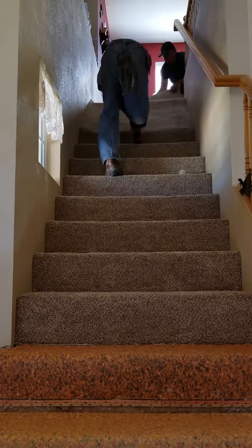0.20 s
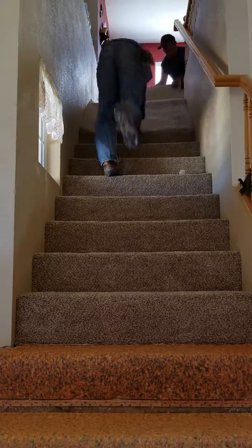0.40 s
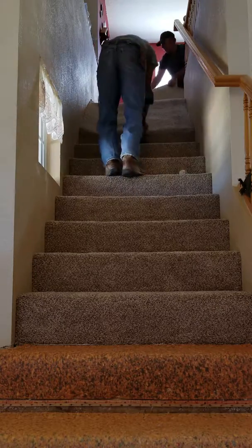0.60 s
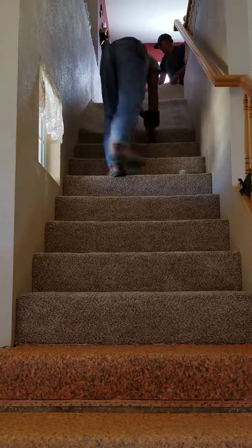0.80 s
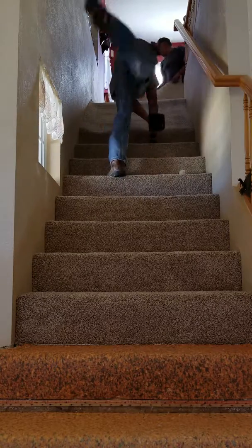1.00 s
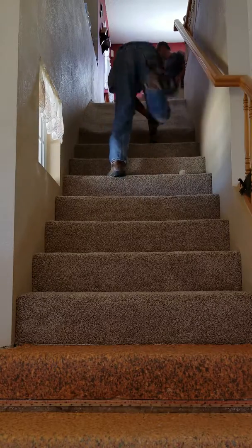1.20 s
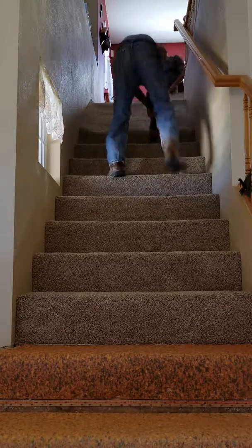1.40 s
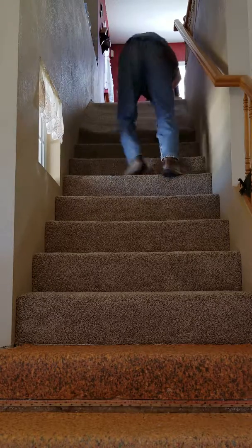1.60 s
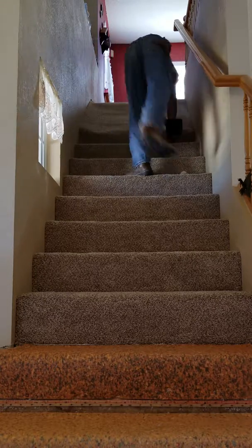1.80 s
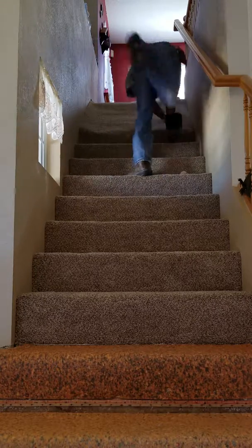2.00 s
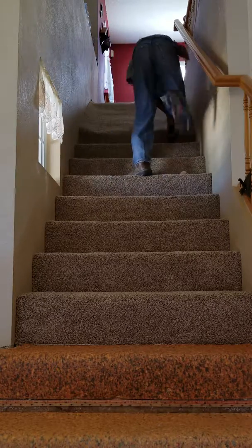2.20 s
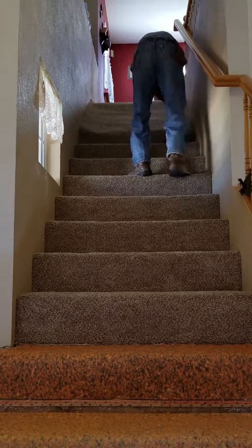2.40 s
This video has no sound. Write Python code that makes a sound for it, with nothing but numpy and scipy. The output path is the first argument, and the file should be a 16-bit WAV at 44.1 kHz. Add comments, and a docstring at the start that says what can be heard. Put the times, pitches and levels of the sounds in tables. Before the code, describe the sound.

Three weighty boot steps land on carpeted stairs in a narrow stairwell, with light brushing between

```python
"""Boots on carpeted stairs

Heavy work boots climb carpeted wooden stairs in a narrow stairwell. Soles slap as fading crackle; landing
weight pushes on ringing stair modes, flexing treads and rumbling timber noise. Resonant knocks fall between.
Boots and trousers brush the carpet as dense grains. Small sharp ticks are laces and grit between steps,
and the bright edge of sole slaps.
A faint metallic ring and quiet noise lie behind; decaying stereo noise gives the stairwell its echoes."""
import sys
import numpy as np
from scipy import signal
from scipy.fft import rfft, irfft
from scipy.io import wavfile

SR = 44100
rng = np.random.default_rng(int(sys.argv[2]) if len(sys.argv) > 2 else 0)


def materialize(psi):
    """Save the field psi as 16-bit PCM at rate SR to the path in sys.argv[1].

    A 1-D psi becomes a single channel; in a 2-D psi each row is a channel.
    """
    bounded = np.clip(np.atleast_2d(psi).T, -1, 1)
    quanta = np.round(bounded * 32767).astype(np.int16)
    wavfile.write(sys.argv[1], SR, quanta)


N = 105840
T = np.arange(N) / SR
SIZE = 2 ** 17  # transform length, samples
HZ = np.maximum(np.arange(SIZE // 2 + 1) * SR / SIZE, 1)

# soles meeting the tread: start_s, level_db, fade_s, treble_db
SOLE_SLAPS = [(0.2027, -16, 0.0019, 0.5), (0.2069, -11.5, 0.0052, -1.5), (1.1512, -20, 0.0012, -9),
              (1.1571, -11.5, 0.0049, 0.5), (2.073, -26.5, 0.0023, 7), (2.078, -19, 0.0053, -8.5),
              (2.085, -26.5, 0.0027, -24)]
# weight landing on a tread: start_s, push_db, contact_s, tread_pitch_hz, tread_ring_db,
# timber_rumble_db, rumble_rise_s, rumble_upper_db
WEIGHT_THUDS = [(0.209, -10.5, 0.0062, 113.4, -4.5, -11.5, 0.0068, 0.5),
                (.25, -14.5, 0.0083, 145, -11, -21, 0.0065, 7),
                (0.544, -26, 0.0093, 115, -28.5, -44, .005, -8),
                (0.767, -19.5, 0.026, 230.4, -39, -48, 0.011, -6.5),
                (0.828, -33, 0.021, 229.3, -51, -60, 0.015, 0),
                (1.162, -11, 0.0095, 338.4, -18, -14.5, 0.013, 9.5),
                (1.177, -11.5, 0.031, 124.2, -10, -49, 0.0033, 7),
                (1.423, -40, 0.011, 288, -42, -30, 0.058, 3.5),
                (1.466, -24, 0.0067, 72.7, -12.5, -33.5, 0.029, -17),
                (1.686, -21.5, .025, 63.8, -35, -67, 0.0084, -2),
                (2.082, -16, 0.0082, 174, -16.5, -19, 0.016, 2.5),
                (2.1, -18, 0.013, 123.4, -22.5, -26, 0.0055, -2),
                (2.299, -38, 0.024, 238, -27, -37, 0.013, -2),
                (2.352, -32.5, 0.0084, 86, -29.5, -39, 0.0061, -2)]
# ringing modes of the staircase: pitch_hz, level_db, t60_s
STAIR_MODES = [(34, -13, 0.15), (47.2, 1.5, 0.34), (63.25, 4, .42), (81, -1, 0.21), (104, -11, 0.12),
               (132.4, 7, 0.18), (147, -14, 0.16), (214, -16, .12), (238, 0, 0.44), (324.6, -1.5, 0.19),
               (484, -5, .22), (550, -22, .22), (710, -27, .22)]
# spectrum of the timber rumble: frequency_hz, density_db
TIMBER_COLOUR = [(25, -19.5), (50, 0.5), (90, 5), (155, 4), (240, 1.5), (330, -4), (460, -11.5), (700, -27),
                 (1200, -30.5), (3000, -57)]
# hollow knocks: start_s, level_db, fade_s, upper_resonances_db
HOLLOW_KNOCKS = [(1.763, -38.5, 0.011, 10), (1.791, -43, 0.01, 13), (2.033, -28.5, 0.028, -3.5),
                 (2.297, -28, 0.022, 0.5), (2.323, -23.5, 0.018, -3.5)]
# resonances of the knocked body: pitch_hz, width_hz, level_db
KNOCK_BODY = [(162, 49, -6), (237, 17.7, 6), (304, 42.4, 1.5), (458, 87, -4.5), (544.6, 42, -3),
              (814, 123, -18), (1430, 280, -25.5)]
# boots and cloth brushing the carpet: start_s, level_db, rise_s, hold_s, fade_s, treble_db
CARPET_SCUFFS = [(0.021, -64, 0.0052, 0.068, 0.021, 9), (0.119, -50, 0.0064, 0.097, 0.027, 5.5),
                 (.29, -49.5, 0.037, 0.18, 0.051, 11.5), (0.534, -47.5, 0.009, 0.039, 0.016, -20),
                 (0.64, -53.5, 0.014, 0.077, .025, 20), (0.752, -39, .01, 0.03, 0.02, 15.5),
                 (0.808, -44.5, 0.026, 0.035, 0.02, 3), (0.928, -41.5, 0.015, 0.019, 0.016, 9.5),
                 (1.016, -47.5, 0.0051, 0.014, 0.032, -17), (1.381, -59, .01, 0.16, 0.082, 9),
                 (1.693, -41, 0.0023, 0.0083, 0.049, 9.5), (1.797, -47.5, 0.0072, 0.085, 0.086, 0),
                 (1.968, -50.5, 0.012, 0.073, 0.02, 2), (2.122, -56.5, 0.013, 0.018, 0.036, 18.5),
                 (2.266, -61, 0.0099, 0.12, 0.058, 9.5)]
# small sharp ticks, laces and grit between steps and the bright edge of sole slaps:
# start_s, bright_tip_db, lower_snap_db, snap_pitch_hz
SMALL_TICKS = [(.136, -29.5, -29.5, 3700), (0.145, -63, -29, 4700), (0.2086, -12.5, -9, 2200),
               (.3953, -34, -50, 4500), (0.42, -46, -27, 4500), (0.4292, -28.5, -26.5, 4700),
               (0.4784, -22.5, -19.5, 6060), (.548, -19.5, -25, 4700), (0.5752, -21, -32, 4960),
               (.58, -33, -27.5, 4300), (0.7302, -39, -25.5, 3240), (.762, -18.5, -29, 3630),
               (.768, -27, -16.5, 3080), (.8205, -30, -32, 3500), (0.8414, -28, -24, 4230),
               (.8683, -26, -35, 3500), (0.9472, -25, -12.5, 3120), (.953, -26, -41, 4500),
               (1.0195, -15, -19.5, 2100), (1.158, -14, -21, 3640), (1.401, -49, -38, 3350),
               (1.6992, -27.5, -20.5, 1960), (1.8174, -14.5, -23, 4040), (1.8208, -14, -17, 1900),
               (1.8735, -22, -43, 2400), (1.8925, -20, -18, 2160), (1.9208, -31, -21.5, 3050),
               (1.9358, -23, -24, 2360), (1.982, -30, -18, 4150), (2.042, -43, -21.5, 3570),
               (2.0787, -15, -20, 4220)]
# spectra of slaps, scuffs, tick tips, tick snaps and the background: frequency_hz, density_db
SLAP_COLOUR = [(60, -8.5), (300, 3), (600, 5.5), (900, -3), (2000, 1), (3000, -2.5), (4000, 0),
               (5600, -5.5), (7800, -16), (10500, -5.5), (13000, -9), (16000, -14.5)]
SCUFF_COLOUR = [(60, 11), (250, 12.5), (600, 4), (1200, 6), (2100, 4.5), (3000, 0.5), (4200, 0.5),
                (6000, -12.5), (8000, -17.5), (10500, -11), (13000, -15.5), (16000, -20.5)]
TIP_COLOUR = [(500, -46), (3000, -12), (6000, -10), (8000, -12), (10200, 2.5), (11600, 0.5), (13300, 0),
              (14600, -6), (16000, -55)]
SNAP_COLOUR = [(200, -46), (1000, 5), (2200, 8), (4000, 7.5), (6200, 6), (8000, 4), (11000, -10),
               (16000, 0)]
QUIET_COLOUR = [(25, -1), (60, 4), (130, -6), (250, 1), (500, -18), (1500, -25), (4000, -27), (8000, -49.5),
                (11000, -24), (16000, -34)]
# left minus right, straight from the boots and then off the walls: frequency_hz, difference_db
DIRECT_PAN = [(60, .5), (170, 3.5), (350, 7.5), (700, -23), (2000, -6), (4500, -13.5), (8000, -14.5),
              (13000, -8.5)]
WALL_PAN = [(60, -9.5), (170, 6), (350, -4), (700, 1.5), (2000, -6), (4500, -8.5), (8000, -12),
            (13000, -3.5)]
# likeness of the two sides in the stairwell: frequency_hz, likeness_0_to_1
LIKENESS = [(35, .998), (70, 1), (170, 1), (350, 0.6), (700, 0.22), (1500, 0.03), (16000, 0)]
# decay of the stairwell: frequency_hz, t60_s
STAIRWELL_DECAY = [(60, 0.55), (160, 0.43), (420, 0.3), (1100, 0.35), (3000, 0.23), (8000, 0.29),
                   (15000, 0.26)]
# echoes of a tick off the close side walls: delay_s, level_db
SIDE_ECHOES = [(.0062, -14), (.0095, -12), (0.0119, -36)]
# faint metallic ring: pitch_hz, level_db, t60_s
RING_MODES = [(1400, -53, 0.067), (3065, -56.5, 0.37), (5930, -63, 0.13)]

TREAD_FADE_S, TIMBER_FADE_S = 0.024, 0.018
TIMBER_EDGE_HZ, KNOCK_EDGE_HZ = 360, 280  # where the upper part begins
SLAP_ROOM_DB, TIMBER_ROOM_DB, SCUFF_ROOM_DB, TICK_ROOM_DB = 2.5, -6, -2, -13.5
SCUFF_T60_S = 0.31
GRAINS_PER_S, GRAIN_SPREAD_DB = 4800, 4
FLUTTER_HZ, FLUTTER_DB = 45, 5  # clumping of the grains
GRIT_PER_S, GRIT_DB = 110, -6  # coarser catches
SNAP_Q, TICK_FADE_S, TIP_LEFT_DB = 1.54, 0.0015, 5.5
RING_AT_S, RING_RISE_S = 1.543, 0.014
FIRST_ECHO_S, ROOM_BUILD_S = 0.006, 0.0019
RIGHT_LAG_S = 0.00011
QUIET_DB = -60.5
CUTOFF_HZ = 15900


def from_db(db):
    """Turn decibels into gain."""
    return 10 ** (np.asarray(db) / 20)


def at_hz(points, hz=HZ):
    """Read a table on a log-frequency axis."""
    frequencies, values = np.transpose(points)
    return np.interp(np.log(hz), np.log(frequencies), values)


def through(x, response):
    """Filter by a frequency response."""
    return irfft(rfft(x, SIZE) * response, SIZE)[..., :N]


def colour(x, points):
    """Shape the spectrum with a causal, minimum-phase filter; white noise keeps its level."""
    gain = from_db(at_hz(points))
    cepstrum = irfft(np.log(gain / np.sqrt(np.mean(gain ** 2))))
    # folding the cepstrum forward in time makes the filter causal
    cepstrum[1:SIZE // 2] *= 2
    cepstrum[SIZE // 2 + 1:] = 0
    return through(x, np.exp(rfft(cepstrum)))


def split(x, edge_hz=6300):
    """Part a sound into what lies below and above an edge."""
    low = through(x, 1 / (1 + (HZ / edge_hz) ** 4))
    return low, x - low


def envelope(start, rise, hold, fade):
    """Rise in a line, hold, then fade exponentially."""
    attack = np.clip((T - start) / max(rise, 1 / SR), 0, 1)
    return attack * np.exp(-np.clip((T - start - rise - hold) / fade, 0, 64))


def burst(start, fade):
    """Crackle at random signs, starting at once and dying away."""
    return envelope(start, 0, 0, fade) * rng.choice([-1, 1], N)


def impulse(start, fade):
    """One click with the energy of such a crackle."""
    return (np.arange(N) == int(start * SR)) * np.sqrt(abs(fade) * SR / 2)


def sides(db):
    """Left and right gains for a level difference, at constant power."""
    gains = from_db(np.array([db, -db]) / 2)
    return gains / np.sqrt(np.mean(gains ** 2, axis=0))


def direct(x):
    """Sound straight from the stairs: a slight lag and stronger treble on the right."""
    lag = np.exp(-2j * np.pi * HZ * np.array([[0], [RIGHT_LAG_S]]))
    return through(x, sides(at_hz(DIRECT_PAN)) * lag)


def heard(x, walls, room_db):
    """Direct sound plus the stairwell."""
    return direct(x) + from_db(room_db) * through(x, walls)


def slaps(walls):
    """The sole crushes the pile in a few milliseconds, and the walls answer the blow."""
    def soles(shape):
        full, treble = 0, 0
        for start, db, fade, treble_db in SOLE_SLAPS:
            hit = from_db(db) * shape(start, fade)
            full = full + hit
            treble = treble + from_db(treble_db) * hit
        return colour(split(full)[0] + split(treble)[1], SLAP_COLOUR)
    # crackle is heard directly; clicks of equal energy excite the walls
    return direct(soles(burst)) + from_db(SLAP_ROOM_DB) * through(soles(impulse), walls)


def thuds():
    """A cushioned push sets the modes of the staircase ringing."""
    force, ring = 0, 0
    for start, push_db, contact, *_ in WEIGHT_THUDS:
        age = np.maximum(T - start, 0) / contact
        push = age * np.exp(-2 * np.pi * age)
        force = force + from_db(push_db) * push / push.sum()
    for k, (hz, db, t60) in enumerate(STAIR_MODES):
        decay = np.exp(-np.log(1000) * T / t60)
        # neighbouring modes start in opposite directions
        ring = ring + (-1) ** k * from_db(db) * np.sin(2 * np.pi * hz * T) * decay
    return through(force, rfft(ring, SIZE)) / 2


def treads():
    """The loaded tread flexes at a pitch of its own and soon stops."""
    flex = 0
    for start, _, contact, hz, ring_db, *_ in WEIGHT_THUDS:
        tone = np.sin(2 * np.pi * hz * (T - start))
        flex = flex + from_db(ring_db) * tone * envelope(start, contact, 0, TREAD_FADE_S)
    return flex


def timber():
    """Treads, risers and walls shudder briefly under each load, as coloured noise."""
    low, high = split(rng.choice([-1., 1.], N), TIMBER_EDGE_HZ)
    rumble = 0
    for start, *_, db, rise, upper_db in WEIGHT_THUDS:
        noise = low + from_db(upper_db) * high
        rumble = rumble + from_db(db) * envelope(start, rise, 0, TIMBER_FADE_S) * noise
    return colour(rumble, TIMBER_COLOUR)


def knocks():
    """Short noisy judders excite the resonances of a hollow wooden body."""
    low, high = split(rng.choice([-1., 1.], N), KNOCK_EDGE_HZ)
    drive, body = 0, 0
    for start, db, fade, upper_db in HOLLOW_KNOCKS:
        drive = drive + from_db(db) * envelope(start, 0, 0, fade) * (low + from_db(upper_db) * high)
    for k, (hz, width, db) in enumerate(KNOCK_BODY):
        detuning = (HZ / hz - hz / HZ) * hz / width
        body = body + (-1) ** k * from_db(db) / (1 + 1j * detuning)
    body = body / (1 + 1j * HZ / KNOCK_BODY[-1][0])  # softens above the top resonance
    return through(drive, body / np.sqrt(np.mean(abs(body) ** 2)))


def fibres():
    """Dense grains in uneven clumps, with a few coarser catches among them."""
    clumps = through(rng.standard_normal(N), 1 / (1 + (HZ / FLUTTER_HZ) ** 2))
    sizes_db = GRAIN_SPREAD_DB * np.minimum(rng.exponential(1, N), 5)
    sizes_db = sizes_db + FLUTTER_DB * clumps / clumps.std()
    fine = (rng.random(N) < GRAINS_PER_S / SR) * from_db(sizes_db)
    coarse = (rng.random(N) < GRIT_PER_S / SR) * rng.uniform(0.35, 1, N)
    grains = fine / fine.std() + from_db(GRIT_DB) * coarse / coarse.std()
    return grains * rng.choice([-1, 1], N)


def scuffs():
    """Carpet fibres and cloth catch and let go in grains; the walls smear each stroke into a wash."""
    grains = fibres()
    full, treble = 0, 0
    for start, db, rise, hold, fade, treble_db in CARPET_SCUFFS:
        stroke = from_db(db) * envelope(start, rise, hold, fade)
        full = full + stroke
        treble = treble + from_db(treble_db) * stroke
    keep = np.exp(-2 * np.log(1000) / (SCUFF_T60_S * SR))  # energy kept per sample
    near, wash = 0, 0
    for level, grain, noise in zip((full, treble), split(grains / grains.std()), split(diffuse())):
        near = near + level * grain
        smeared = np.sqrt(signal.lfilter([1 - keep], [1, -keep], level ** 2))
        wash = wash + smeared * noise
    room = from_db(SCUFF_ROOM_DB) * through(wash, sides(at_hz(WALL_PAN)))
    return colour(direct(near) + room, SCUFF_COLOUR)


def ticks():
    """Tiny hard contacts: a bright tip and a lower pitched snap, echoed by the side walls."""
    tip, snap = 0, 0
    for start, tip_db, snap_db, hz in SMALL_TICKS:
        crackle = burst(start, TICK_FADE_S)
        tip = tip + from_db(tip_db) * crackle
        snap = snap + from_db(snap_db) * signal.lfilter(*signal.iirpeak(hz, SNAP_Q, fs=SR), crackle)
    echoes = 1
    for delay, db in SIDE_ECHOES:
        echoes = echoes + from_db(db) * np.exp(-2j * np.pi * HZ * delay)
    panned_tip = colour(tip, TIP_COLOUR) * sides(TIP_LEFT_DB)[:, None]
    return through(panned_tip + colour(snap, SNAP_COLOUR), echoes)


def faint_ring():
    """Something small and metallic rings briefly, as decaying sine modes."""
    ring = 0
    for hz, db, t60 in RING_MODES:
        swell = envelope(RING_AT_S, RING_RISE_S, 0, t60 / np.log(1000))
        ring = ring + from_db(db) * np.sin(2 * np.pi * hz * T) * swell
    return ring


def diffuse():
    """Stereo noise, alike in the bass and unrelated in the treble."""
    mid, side = rng.standard_normal((2, N))
    alike = np.clip(at_hz(LIKENESS), -1, 1)
    return through(mid, np.sqrt(1 + alike)) + through(side, np.sqrt(1 - alike)) * [[1], [-1]]


def stairwell():
    """Response of the walls: dense echoes that die at a rate of their own in each octave."""
    noise, tail = diffuse(), 0
    octaves = np.arange(6, 15)  # powers of two, in Hz
    for octave, share in zip(octaves, np.eye(len(octaves))):
        decay = from_db(-60 * T / at_hz(STAIRWELL_DECAY, 2.0 ** octave))
        band = through(noise, np.interp(np.log2(HZ), octaves, share))
        tail = tail + band * decay
    tail = tail * np.clip((T - FIRST_ECHO_S) / ROOM_BUILD_S, 0, 1)
    return rfft(tail / np.sqrt(np.sum(tail ** 2) / 2), SIZE) * sides(at_hz(WALL_PAN))


def house_quiet():
    """The quiet of the house: steady, diffuse coloured noise."""
    return from_db(QUIET_DB) * colour(diffuse(), QUIET_COLOUR)


def scene():
    """Every sound of the climb in the stairwell, over the quiet of the house."""
    walls = stairwell()
    stairs = heard(thuds() + treads(), walls, room_db=-25.5)
    stairs = stairs + heard(timber(), walls, TIMBER_ROOM_DB)
    stairs = stairs + heard(knocks(), walls, room_db=-0.5)
    boots = slaps(walls) + scuffs() + heard(ticks(), walls, TICK_ROOM_DB)
    return stairs + boots + faint_ring() + house_quiet()


def record(dry):
    """Clip peaks at full scale, then cut the top with a steep low-pass."""
    low_pass = signal.ellip(10, .2, 80, CUTOFF_HZ, fs=SR, output="sos")
    return signal.sosfilt(low_pass, np.clip(dry, -1, 1))


dry = scene()
out = record(dry)
materialize(out)
```